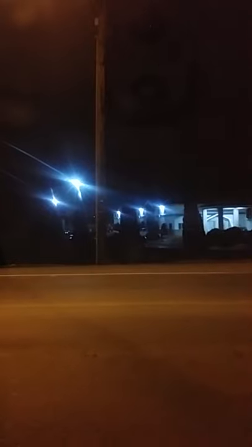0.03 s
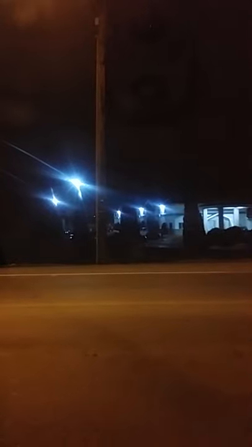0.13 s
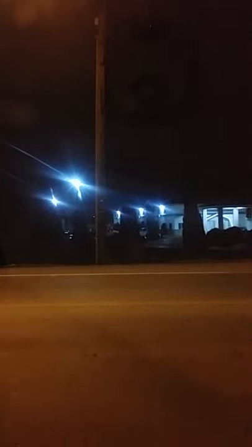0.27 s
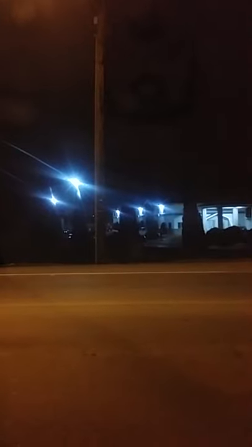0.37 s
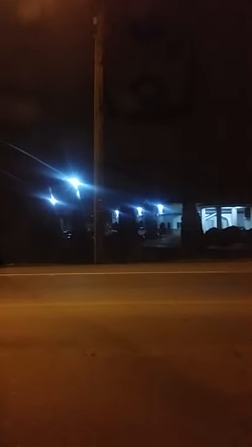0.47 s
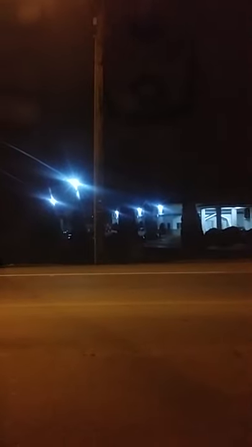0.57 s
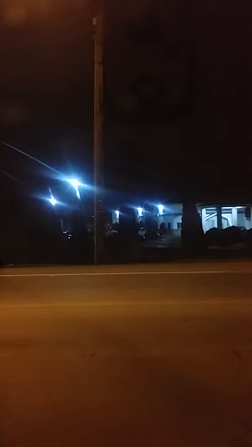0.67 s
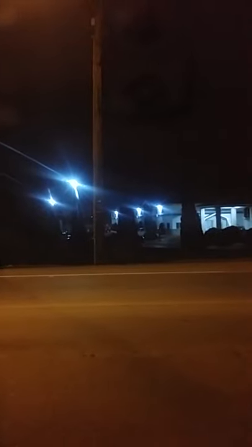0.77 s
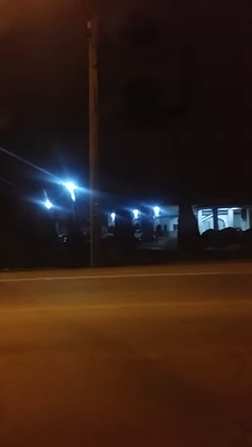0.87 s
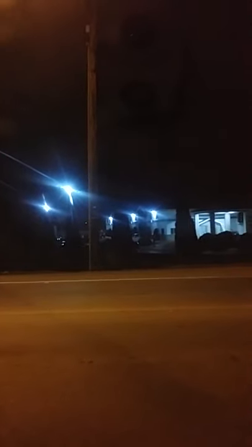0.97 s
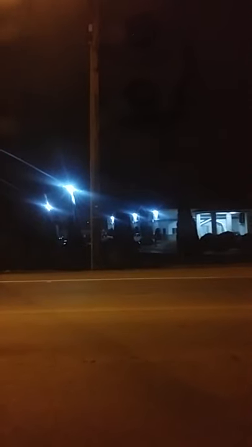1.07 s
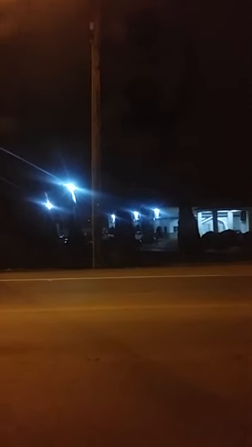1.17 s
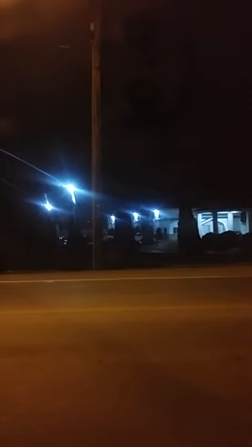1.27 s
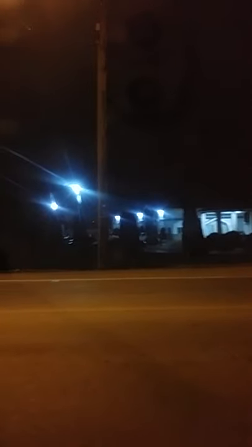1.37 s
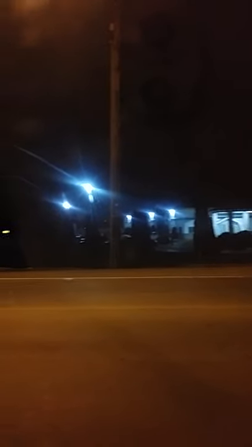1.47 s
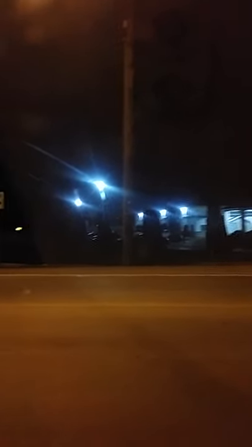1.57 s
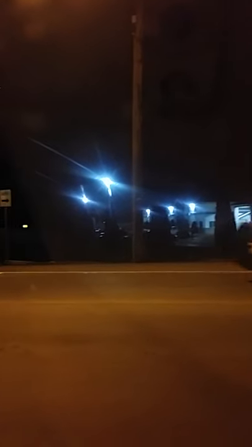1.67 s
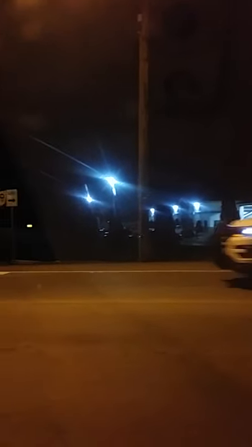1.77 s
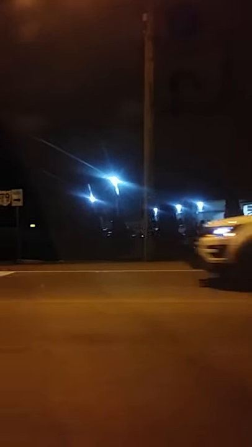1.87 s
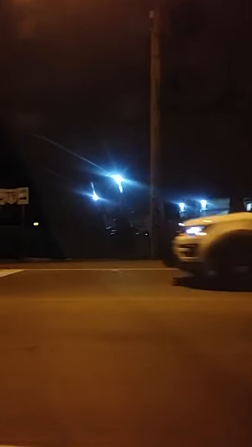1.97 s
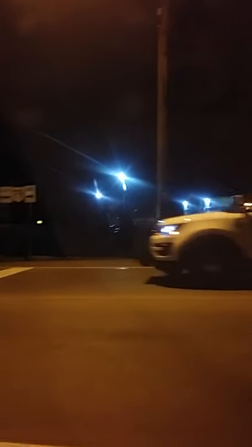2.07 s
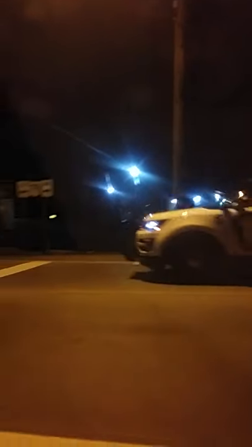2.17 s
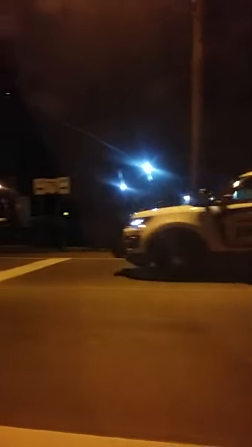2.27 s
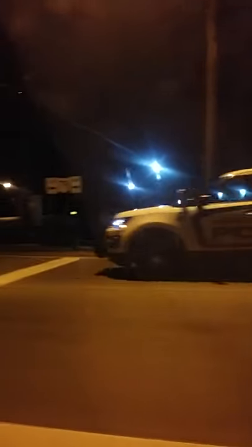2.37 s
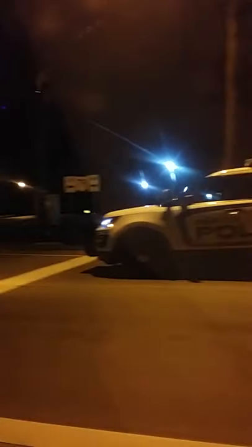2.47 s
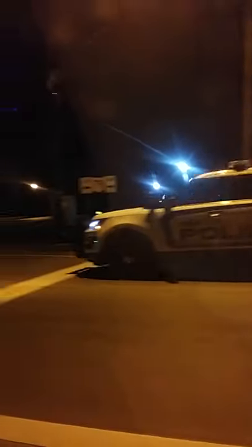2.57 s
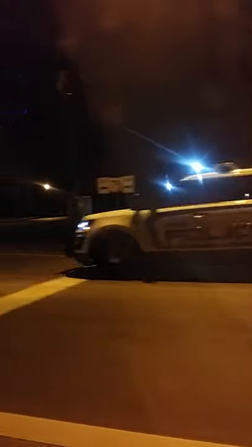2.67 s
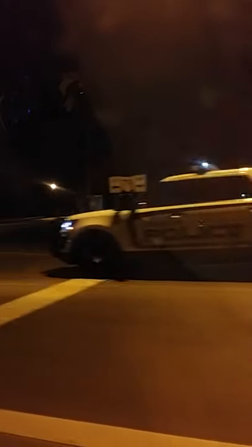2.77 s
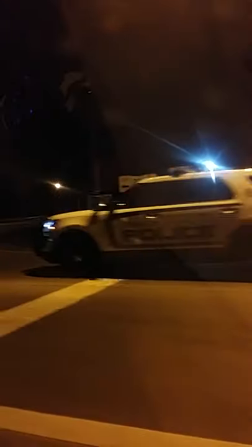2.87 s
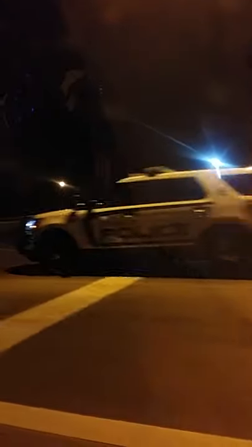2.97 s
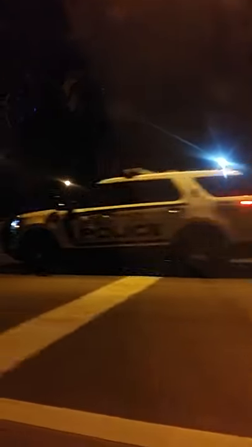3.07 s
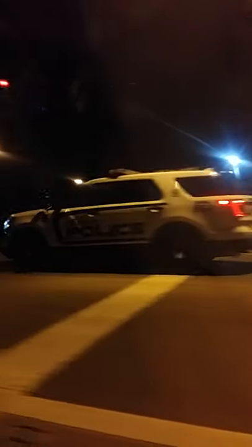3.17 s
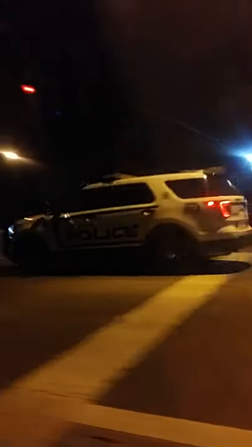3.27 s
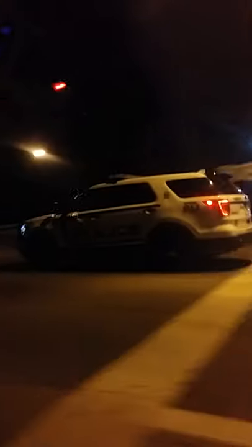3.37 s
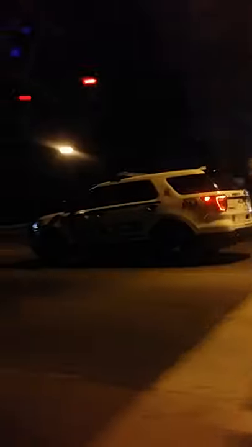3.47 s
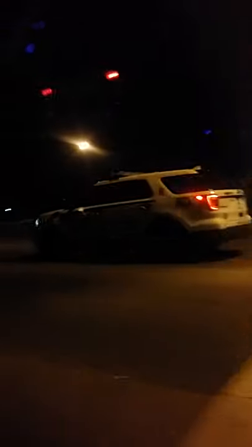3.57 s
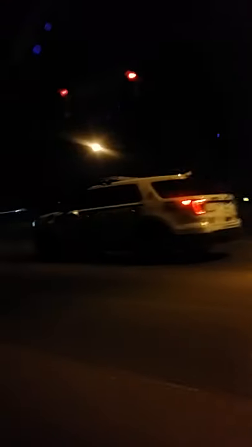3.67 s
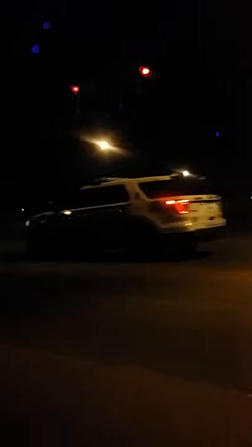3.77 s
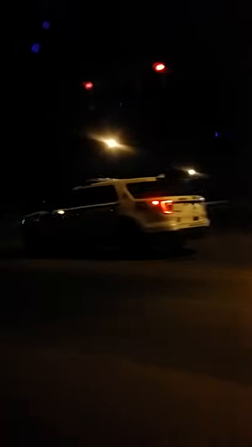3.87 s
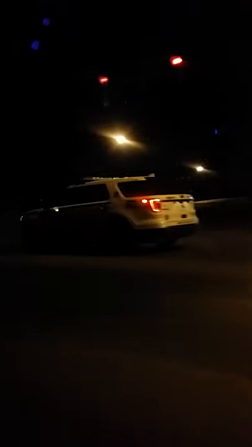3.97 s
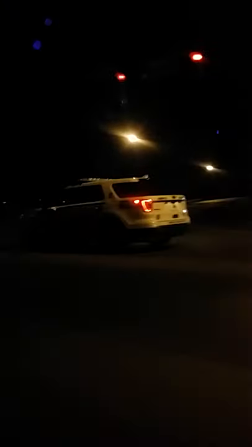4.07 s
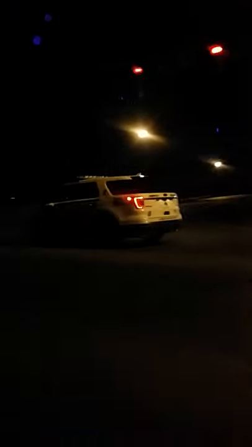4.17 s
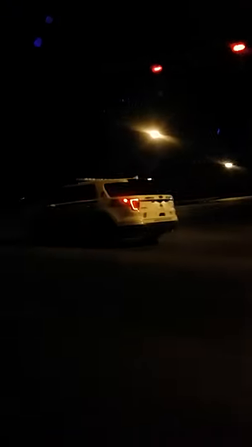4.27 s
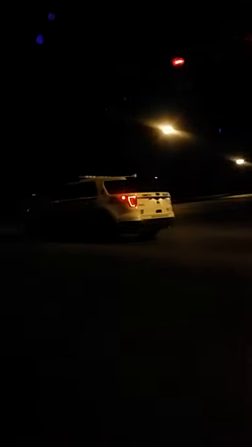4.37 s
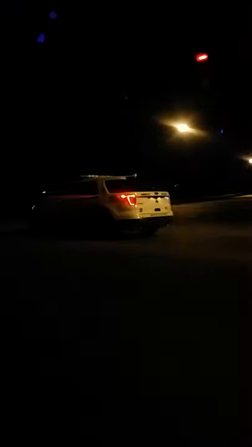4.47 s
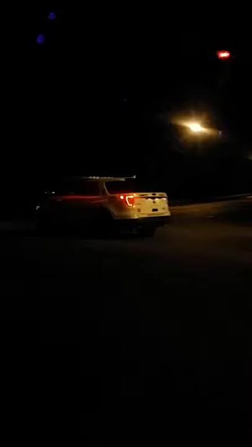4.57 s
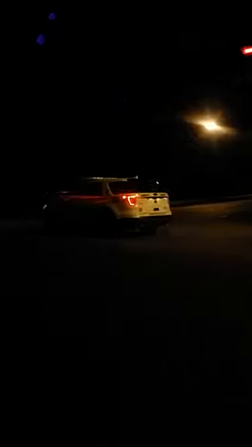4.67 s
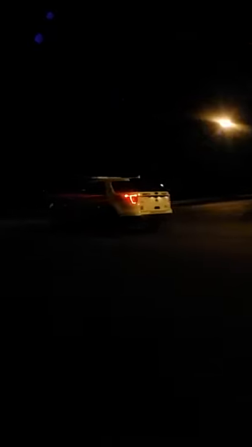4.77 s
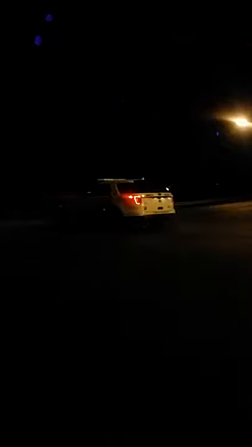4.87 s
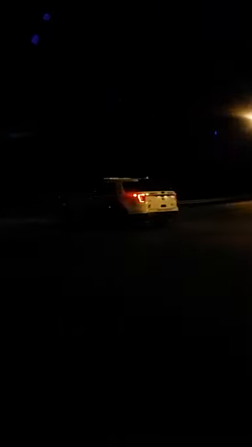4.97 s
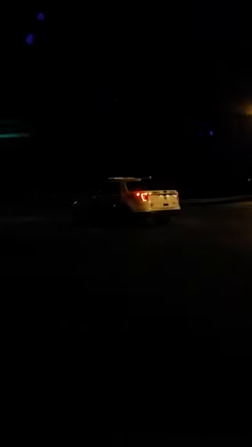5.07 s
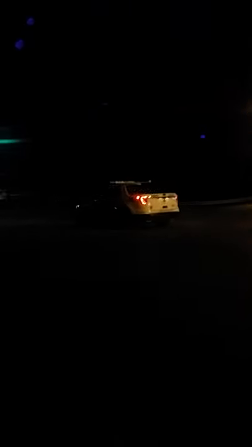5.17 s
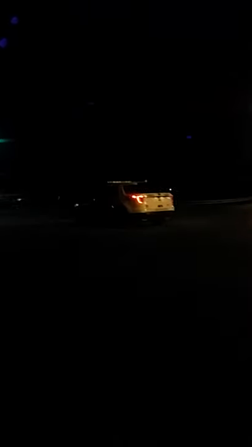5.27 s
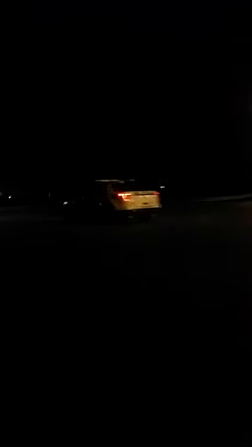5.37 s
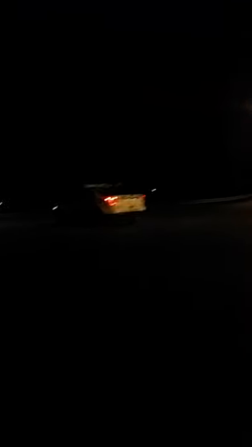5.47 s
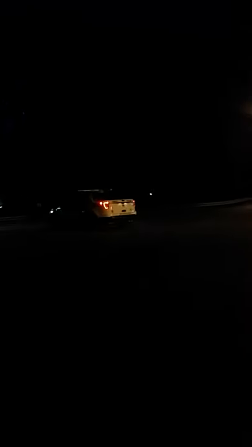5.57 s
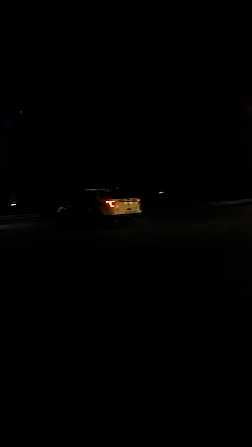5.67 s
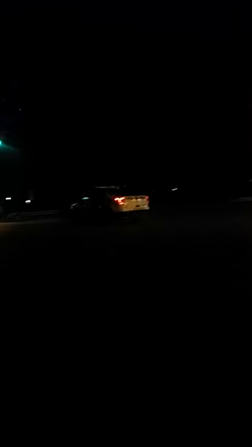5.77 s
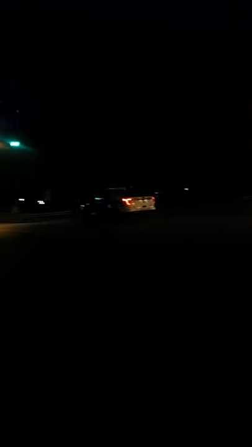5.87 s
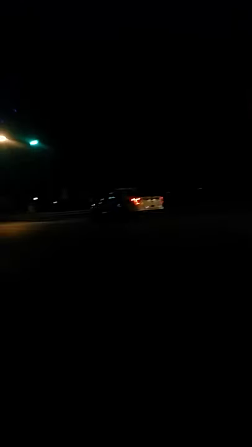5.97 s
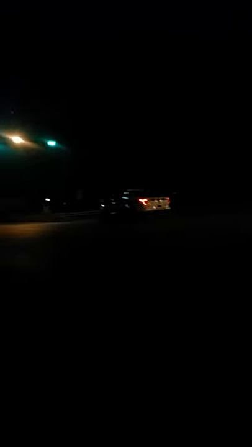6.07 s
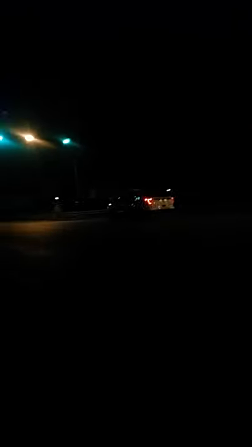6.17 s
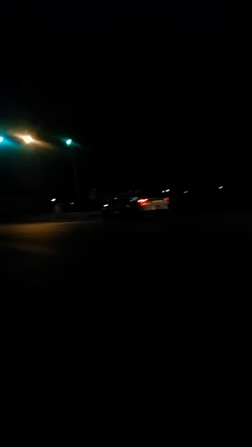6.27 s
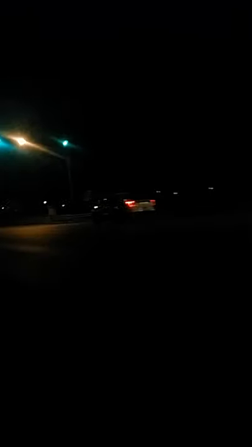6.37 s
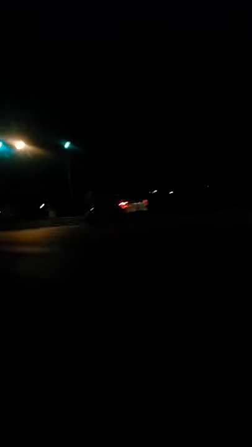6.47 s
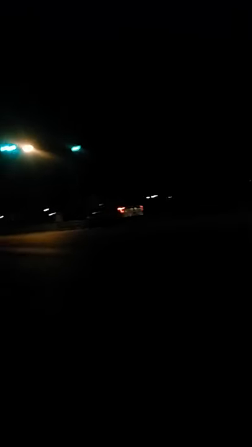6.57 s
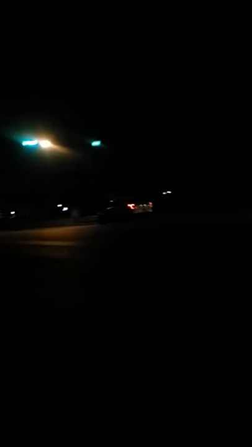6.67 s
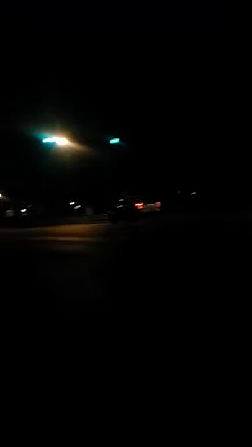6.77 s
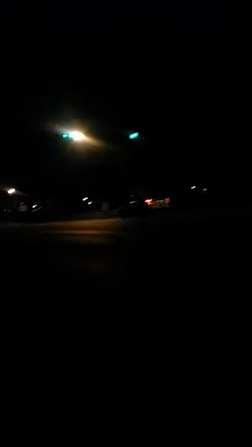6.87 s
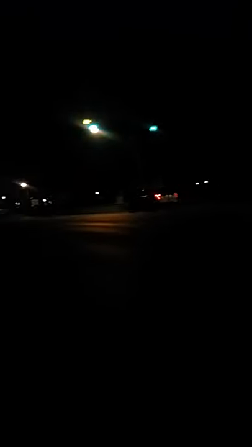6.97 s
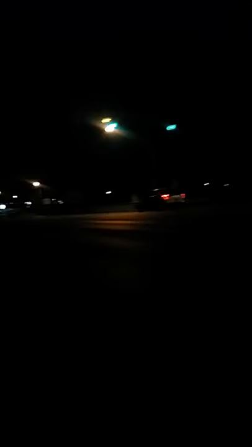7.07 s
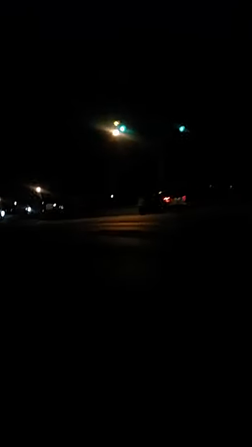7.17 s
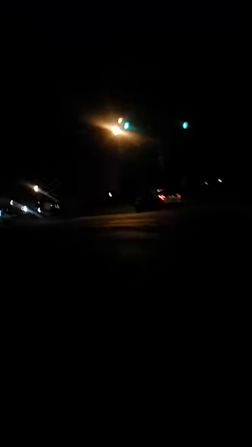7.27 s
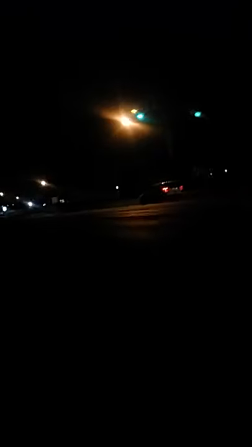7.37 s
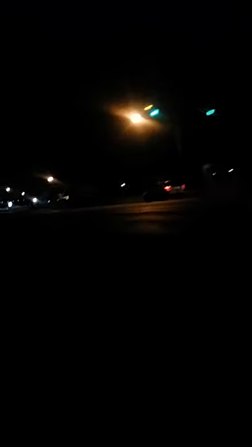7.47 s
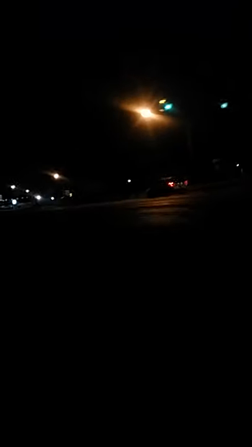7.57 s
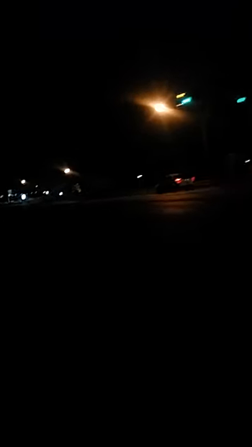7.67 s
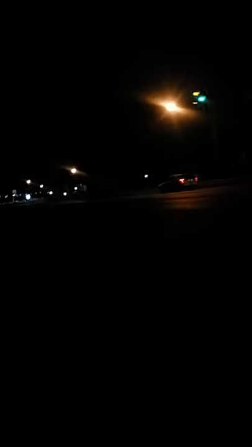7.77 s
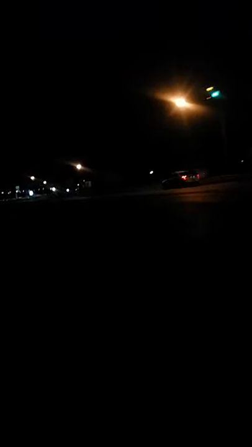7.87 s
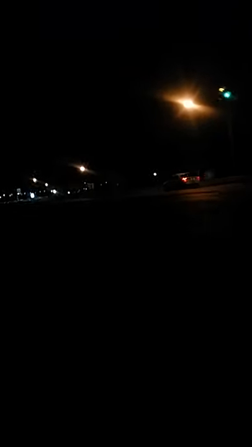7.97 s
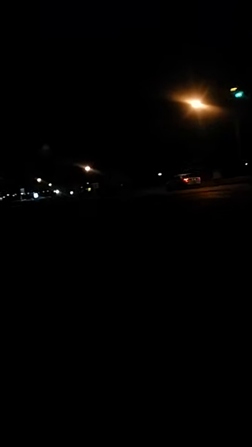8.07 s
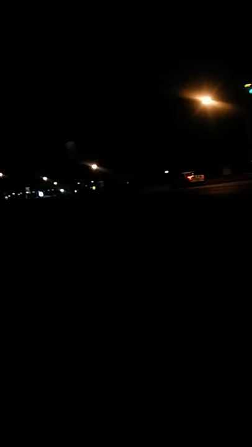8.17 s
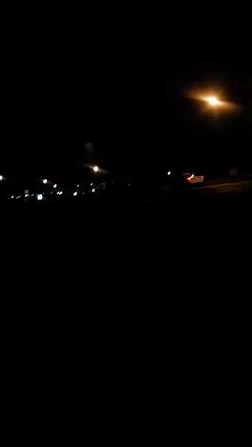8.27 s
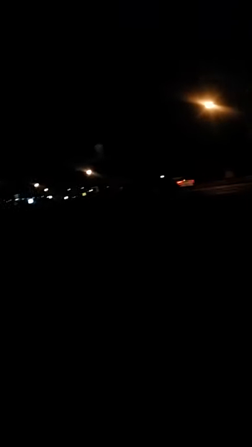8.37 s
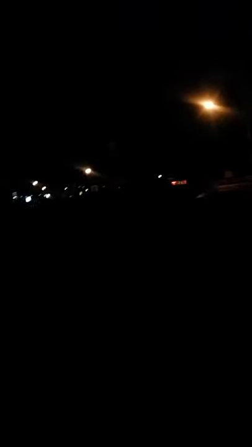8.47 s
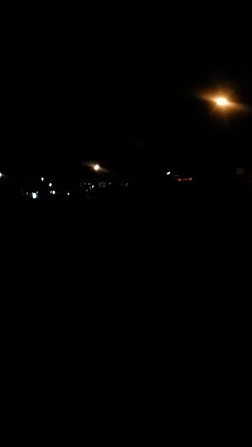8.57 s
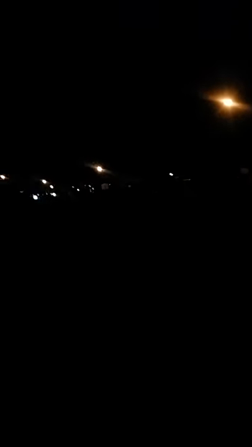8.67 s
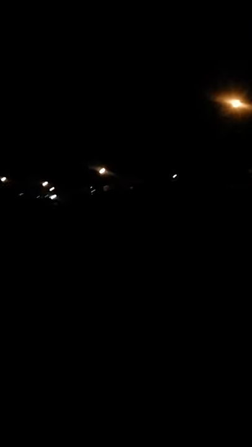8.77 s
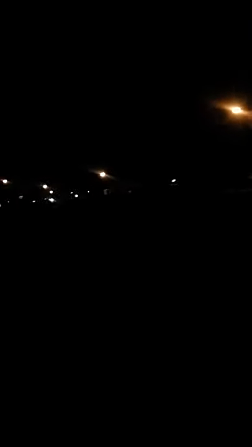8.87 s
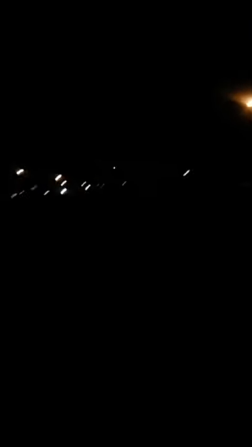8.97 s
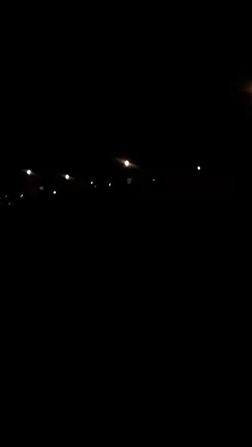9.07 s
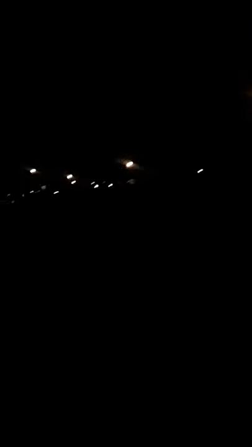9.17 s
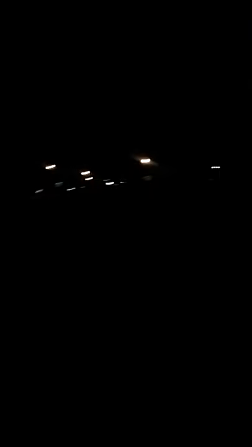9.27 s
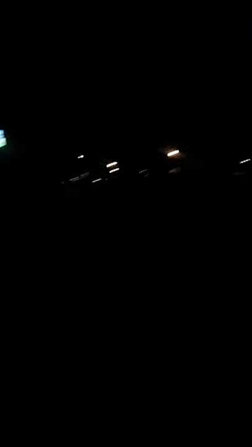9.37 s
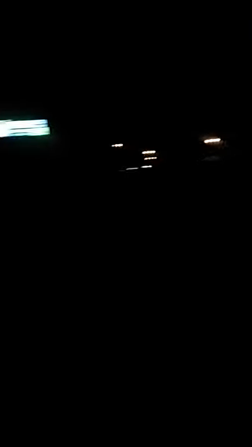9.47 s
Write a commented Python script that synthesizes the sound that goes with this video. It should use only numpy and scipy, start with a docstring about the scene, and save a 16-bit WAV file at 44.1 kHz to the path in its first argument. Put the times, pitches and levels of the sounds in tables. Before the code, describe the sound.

Close in-cabin stereo sound of a car pulling out. Quiet idle, thin hiss, a brief rustle and a dry clicking indicator come first. Then the engine note jumps up, holds, and surges into a loud growling rev with intake rush. It eases off, sinks in pitch with a rough burble at the shift, and settles into a steady, fuller pull.

```python
"""Engine pulling away, heard on board

An engine idles, pulls away, revs through first gear, shifts up and settles into a slow climb in speed.
The exhaust is a bank of cosines locked to the crank: a boom on the first orders, a growl on the half orders.
Rumble, clatter, intake rush and hiss are coloured noise that follows the drive and beats with the crank.
Valve ticks and relay snaps are short noise bursts in time; loose fittings click now and then.
A rattle, an idle fizz, a rustle, a whoosh on the hard pull and a burble in the shudders fill in the rest."""
import sys
import numpy as np
from scipy import signal
from scipy.fft import rfft, irfft, next_fast_len
from scipy.io import wavfile
from scipy.ndimage import uniform_filter1d, minimum_filter1d

SR = 44100
rng = np.random.default_rng(int(sys.argv[2]) if len(sys.argv) > 2 else 0)


def output_pcm(signal):
    """Save a mono or channel-first signal as 16-bit PCM at the path in sys.argv[1].

    Samples are clipped to [-1, 1] before scaling.
    """
    pcm = np.clip(np.atleast_2d(signal).T, -1, 1) * 32767
    wavfile.write(sys.argv[1], SR, np.round(pcm).astype(np.int16))


N = 419832
TIME = np.arange(N) / SR
BINS = np.fft.rfftfreq(N, 1 / SR)

# crankshaft speed: t/s, f/Hz (turns per second)
CRANK_SPEED = [(0, 23.4), (.66, 22.7), (.88, 23.7), (1.3, 24.2), (1.5, 31.9), (1.64, 37.5), (1.76, 41.9),
               (1.9, 47.1), (1.92, 47.3), (2.54, 47.6), (3.18, 51.5), (3.52, 64.3), (3.63, 68.4),
               (4.05, 76.2), (4.25, 79.1), (4.44, 78.7), (5.12, 86.5), (5.26, 87.4), (5.49, 80.9),
               (5.85, 77.5), (6.36, 64.7), (6.5, 61.0), (6.61, 53.5), (6.63, 52.9), (6.75, 53.3),
               (7.11, 57.2), (7.44, 59.4), (9.52, 69.8)]
# engine effort: t/s, load (0 coasting to 1 pulling), exhaust pulse level/dB
ENGINE_DRIVE = [(0.0, 0, -16), (1.28, 0.046, -16.5), (1.5, 0.13, -3.6), (1.9, 0.27, -2.5),
                (3.15, 0.24, 0.2), (3.4, 0.39, 1), (4.0, 0.44, 1.4), (4.35, 0.64, 0), (4.7, 0.71, -1.2),
                (5.5, 0.63, -0.5), (5.68, 0.11, -0.5), (6.35, 0.0, -4.5), (6.55, 0.25, 1.6),
                (6.9, 0.042, 0), (7.25, 0.32, 3.5), (7.9, 0.62, 1.5), (8.3, 0.5, 1.3), (9.52, 0.64, 0.1)]
# throttle: t/s, opening (0 to 1)
THROTTLE_OPENING = [(1.3, 0.12), (3.17, 0.16), (3.36, .95), (4.15, 0.64), (4.45, 0.3), (4.95, 0.66),
                    (5.25, .35), (5.6, 0.29), (6.9, 0.27), (7.03, 0.77), (8.8, 0.67), (9.52, 0.6)]
# driveline shudders as the drive is let off and taken up again:
# t/s, half width/s, added growl level/dB, crank wobble/turns, lost boom level/dB, burble amplitude
DRIVELINE_SHUDDERS = [(5.43, .12, 6, .022, 1.5, .06), (6.47, 0.075, 4.5, .025, 0, 0.047)]
WOBBLE, BOOM_LOSS, GROWL_GAIN, BURBLE_AMPLITUDE = 3, 4, 2, 5  # columns of the shudders

# what the silencer passes of the first crank orders: f/Hz, level/dB
SILENCER_RESPONSE = [(40, -47), (48, -32.5), (56, -19.5), (66, -10), (76, -5.5), (86, -6.5), (97, -4),
                     (110, -13), (122, -12.5), (131, -19.5), (143, -10), (154, -18), (170, -13.5),
                     (205, -18), (238, -14), (252, -16), (275, -10), (295, -21.5), (320, -34), (370, -20),
                     (395, -39.5), (418, -17), (440, -45)]
# boom, which load moves up the orders: crank order, coasting level/dB, level added at full load/dB
BOOM_LEVELS = [(1, 0.5, -12.5), (2, -5, 10), (3, -3, 8.5), (4, -3.5, 3.5), (5, -4, 4.1)]
# resonances of exhaust and body: f/Hz, level/dB
PIPE_RESONANCES = [(45, -19.5), (70, -1), (140, -7.5), (230, -2), (280, 3), (320, -7), (372, -1),
                   (394, -9.5), (418, -8.5), (445, -12), (530, -24), (615, -9), (670, -8), (745, -2),
                   (820, -21), (890, -6), (1000, -35), (1400, -34.5)]
# pattern of the unequal firings: crank order, level/dB
FIRING_PATTERN = [(1.5, -8), (2.5, -10.5), (3.5, -4.5), (4.5, 4), (5.5, 7), (6, 6), (6.5, 9), (7, -1.5),
                  (7.5, 7), (8, -3.5), (8.5, 8.5), (9, 5.5), (9.5, 3), (10.5, 2.5), (11.5, 0.5), (12, 3.5),
                  (12.5, -8.5), (13.5, -5.5)]

# noise colours, each f/Hz, relative level/dB (per Hz)
# gas and road shaking the body
RUMBLE_COLOUR = [(20, -29.5), (35, -20), (55, -11.5), (90, 4.5), (130, 1.5), (275, -3.5), (320, -14),
                 (480, -12.5), (570, -18), (700, -12.5), (850, -32.5), (1100, -42.5), (2000, -61.5)]
# moving parts
CLATTER_COLOUR = [(450, 5.5), (800, 6.5), (1100, 4), (1350, -1), (1620, 1), (1850, -3), (2100, -2.5),
                  (2350, -0.5), (2750, -6.5), (3100, -9.5), (3600, -13.5), (5000, -26.5), (9000, -37.5)]
# air rushing in
INTAKE_COLOUR = [(2200, -28.5), (3300, 3), (4400, 0.5), (5500, -2.5), (8000, -12), (15000, -19)]
# exhaust hiss
HISS_COLOUR = [(3500, -17), (5300, 3.5), (6400, 3.5), (7300, -1.5), (7900, -1), (8400, -2.5), (8900, -8.5),
               (9600, -5.5), (11000, -11), (14500, -11.5), (15500, -17)]
# loose panel buzzing
RATTLE_COLOUR = [(4500, -30.5), (6000, -7.5), (7300, -6), (8400, -3.5), (9300, -14.5), (15000, -26.5)]
# thin hiss at idle
FIZZ_COLOUR = [(2500, -14.5), (5000, 1), (9000, -0.5), (15000, 1)]
# relay closing
TICK_COLOUR = [(600, -9.5), (2200, 7), (4200, -2), (6400, 1), (8500, 0.5), (11000, -6), (15500, 2.5)]
# relay opening
TOCK_COLOUR = [(600, -4), (2200, -1), (4200, -6), (6400, 0), (9300, 3), (11000, -12.5), (15500, -13.5)]
# loose fittings
CLICK_COLOUR = [(500, -2), (1300, 10), (2200, 11), (4200, 0), (6400, 3.5), (8500, -1.5), (11000, -6),
                (15500, -16.5)]
# rush of the hard pull
WHOOSH_COLOUR = [(600, -6.5), (920, 17.5), (1300, -1.5), (2300, 9), (3300, -5.5), (5000, -9.5), (6400, 3.5),
                 (7800, -7), (11000, -22.5)]
# rough exhaust during a shudder
BURBLE_COLOUR = [(120, -20), (230, -3), (300, 2), (410, 0), (500, -11), (720, -9), (950, -28.5),
                 (2000, -58.5)]

# loose fittings: t/s, level/dB before trim, low part against the whole/dB before trim, ring time/s
FITTING_CLICKS = [(0.2804, -39, 4, 0.069), (0.305, -37, 3, 0.046), (0.825, -38, -2, 0.039),
                  (1.343, -31.5, -4.5, 0.07), (1.717, -27.5, -1, 0.08), (1.952, -32.5, 1, 0.047),
                  (3.014, -37, -17, 0.054), (3.046, -34, -2, 0.053), (3.531, -20, -0.5, 0.08),
                  (8.775, -32.5, 7, 0.06), (8.7895, -27.5, 7, 0.1), (8.8144, -33, 3, 0.079)]
# colour of the two ports: f/Hz, left minus right level/dB
PORT_BALANCE = [(40, -1.2), (200, 0), (450, 1), (750, -3), (950, 4), (1400, 0), (1800, 0), (2350, -6),
                (2900, 0), (4500, 3), (5600, 2), (6400, 9), (7500, 0), (8400, -10), (11500, 0)]
# how alike the two ports are: f/Hz, likeness (0 unrelated to 1 identical)
PORT_LIKENESS = [(100, 0.66), (300, 0.97), (550, 0.83), (800, 0.54), (1300, 0.15), (15000, 0)]

IDLE_HZ = 24  # crank speed from which octaves are counted
BUZZ_HZ, BUZZ_WIDTH_HZ = 78.65, 3.67  # the body buzzes as the crank speed passes its resonance
RELAY_START_S, RELAY_STEP_S, RELAY_STOP_S = 0.2665, 0.3502, 9.1
EDGE_HZ = 15750  # top of the band


def from_db(db):
    """Decibels to amplitude."""
    return 10 ** (np.asarray(db) / 20)


def unit(x):
    """Scale to rms 1."""
    return x / np.sqrt(np.mean(x ** 2) + 1e-20)


def curve(table, column):
    """One column of a table, joined by straight lines in time."""
    rows = np.array(table)
    return np.interp(TIME, rows[:, 0], rows[:, column])


def at_hz(points, hz):
    """A spectrum table read on a log-frequency axis."""
    f, value = np.transpose(points)
    return np.interp(np.log(hz + 1), np.log(f), value)


def octaves_above_idle(speed):
    """Crank speed as octaves above idle."""
    return np.log2(speed / IDLE_HZ)


def wander(rate_hz):
    """Slow chance of rms 1, up to about the given rate."""
    lowpass = 1 / (1 + (BINS / rate_hz) ** 4)
    return unit(irfft(rfft(rng.standard_normal(N)) * lowpass, N))


def drift(rate_hz, size=512):
    """Slow chance: random values joined by straight lines, rate_hz of them a second."""
    return np.interp(TIME * rate_hz, np.arange(size), rng.standard_normal(size))


def noise(colour):
    """Coloured stereo noise: alike at both ports in the bass, unrelated in the treble."""
    mid, side = rfft(rng.standard_normal((2, N)))
    same = np.clip(at_hz(PORT_LIKENESS, BINS), -1, 1)
    mid, side = mid * np.sqrt(1 + same), side * np.sqrt(1 - same)
    pair = irfft(np.array([mid + side, mid - side]) * from_db(at_hz(colour, BINS)), N)
    return pair / np.std(pair.mean(0))


def puffs(turns, depth):
    """Gas leaves in one puff for each turn of the crank, so the level swells once a turn."""
    return unit(1 + depth * np.cos(2 * np.pi * turns))


def shudder(column):
    """One column of the shudders, each swelling and dying smoothly."""
    return sum(row[column] * np.exp(-((TIME - row[0]) / row[1]) ** 2) for row in DRIVELINE_SHUDDERS)


def boom(turns, speed, boom_db=0.98, dispersion=0.632, sway_db=0.59):
    """The first crank orders: near-pure tones that swell and fade through the silencer's resonances."""
    load, out = curve(ENGINE_DRIVE, 1), np.zeros(N)
    for order, (_, coast_db, load_db) in enumerate(BOOM_LEVELS, 1):
        uneven = 1 + .06 * wander(20)
        lag = dispersion * order ** 2  # higher orders are delayed more, which smears each pulse
        passed_db = at_hz(SILENCER_RESPONSE, order * speed)
        level = from_db(passed_db + coast_db + load_db * load + sway_db * order * drift(5))
        out += level * uneven * np.cos(2 * np.pi * order * turns - lag)
    return out * from_db(boom_db + curve(ENGINE_DRIVE, 2) - shudder(BOOM_LOSS))


def pipe_levels(speed):
    """Lower pipe modes growl with load and in the shudders; upper ones rasp with load and speed."""
    load, octaves = curve(ENGINE_DRIVE, 1), octaves_above_idle(speed)
    growl_db = -33 + 11 * load - 0.85 * octaves + shudder(GROWL_GAIN)
    rasp_db = -54.5 + 10.0 * load + 7.5 * octaves
    return from_db(growl_db), from_db(rasp_db)


def growl(turns, speed, split_hz=520, sway_db=2.5, smear_turns=0.006, count=56):
    """Firings repeat every two turns: half orders and overtones sound, phases scattered by pipe echoes."""
    low, high = pipe_levels(speed)
    grid = np.arange(3000.)  # 1 Hz steps
    pipe = from_db(at_hz(PIPE_RESONANCES, grid)) / (1 + (grid / 1600) ** 6)
    upper = 1 - 1 / (1 + (grid / split_hz) ** 12)
    # higher tones reach the two ports out of step
    spread = np.arccos(np.clip(at_hz(PORT_LIKENESS, grid), -1, 1)) / 2
    steadiness = 1 - 0.36 * curve(ENGINE_DRIVE, 1)  # load calms the phase scatter
    out = np.zeros((2, N))
    for order in np.arange(3, count) / 2:
        if order % 1 == 0 and order <= len(BOOM_LEVELS):
            continue  # the boom already sounds these
        hz = np.minimum(order * speed, len(grid) - 1).astype(int)
        firing_db = np.interp(order, *np.transpose(FIRING_PATTERN))
        body = pipe[hz] * (low + (high - low) * upper[hz])
        level = from_db(firing_db + sway_db * drift(2.5)) * body
        scattered = turns + smear_turns * steadiness * drift(30)
        phase = 2 * np.pi * (order * scattered + rng.random())
        side = rng.choice([-1, 1]) * spread[hz]
        out += level * np.cos([phase + side, phase - side])
    return out * (1 + .15 * wander(25))


def cyclic(turns, speed, colour, size=1024):
    """Random small knocks that repeat every two-turn engine cycle: a fine comb of lines, coloured."""
    cycle = np.linspace(0, 2, size, endpoint=False)
    knocks = np.array([np.interp(turns, cycle, rng.standard_normal(size), period=2) for port in range(2)])
    pair = irfft(rfft(knocks * np.sqrt(speed)) * from_db(at_hz(colour, BINS)), N)
    return pair / np.std(pair.mean(0))


def rush(turns, speed, colour, idle_db, octave_db, throttle_db, buzz_db, damping=0.42):
    """Part repeating, part turbulent noise that follows speed, throttle and body buzz, which load damps."""
    repeat = .45  # share of the power that repeats each cycle
    grain = np.sqrt(repeat) * cyclic(turns, speed, colour) + np.sqrt(1 - repeat) * noise(colour)
    resonance = 1 / (1 + ((speed - BUZZ_HZ) / BUZZ_WIDTH_HZ) ** 4)
    buzz = (1 - damping * curve(ENGINE_DRIVE, 1)) * resonance
    level_db = idle_db + octave_db * octaves_above_idle(speed)
    return grain * from_db(level_db + throttle_db * curve(THROTTLE_OPENING, 1) + buzz_db * buzz)


def machinery(turns, speed, flutter_db=1.2):
    """Clatter of moving parts, intake rush, exhaust hiss and whoosh, all beating with the crank."""
    clatter = rush(turns, speed, CLATTER_COLOUR, idle_db=-49.5, octave_db=2.0, throttle_db=10.5, buzz_db=4.0)
    intake = rush(turns, speed, INTAKE_COLOUR, idle_db=-70.5, octave_db=0.0, throttle_db=18.0, buzz_db=5.5)
    hiss = rush(turns, speed, HISS_COLOUR, idle_db=-64.5, octave_db=-2.34, throttle_db=-3.0, buzz_db=15)
    flutter = from_db(flutter_db * wander(22))
    return (clatter + intake + hiss + whoosh()) * puffs(turns, depth=0.11) * flutter


def valves(turns, speed, tick_db=-42, tick_hz=6550, width_hz=400, decay_s=0.00083, weak=0.49):
    """A bright narrow-band tick on every turn, strong and weak in turn; it sinks as speed rises."""
    band = 1 / (1 + ((BINS - tick_hz) / width_hz) ** 2)
    ring = unit(irfft(rfft(rng.standard_normal((2, N))) * band, N))
    since_tick_s = (turns % 1) / speed
    strike = np.exp(-since_tick_s / decay_s) * np.where(turns % 2 < 1, 1, weak)
    return ring * strike * from_db(tick_db) * (speed[0] / speed) ** 1.5


def rattle(turns, speed, rattle_db=-47, load_db=-12):
    """The first crank order buzzes a loose panel once per turn, loosest when the engine coasts."""
    first_order_db = at_hz(SILENCER_RESPONSE, speed)
    shake = from_db(first_order_db + load_db * curve(ENGINE_DRIVE, 1) + rattle_db)
    return noise(RATTLE_COLOUR) * shake * puffs(turns, depth=0.75)


def rumble(turns, rumble_db=-25.0, follow=0.66):
    """Turbulent gas and the road shake the body, harder as the exhaust pulses grow."""
    level = from_db(rumble_db + follow * curve(ENGINE_DRIVE, 2))
    return noise(RUMBLE_COLOUR) * level * puffs(turns, depth=0.083)


def fizz(speed, fizz_db=-63, octave_db=-11.5):
    """A thin hiss at idle that falls away steeply as the crank speeds up."""
    return noise(FIZZ_COLOUR) * from_db(fizz_db + octave_db * octaves_above_idle(speed))


def snaps(times, colour, peak_db, t60, rise_s=0.00035):
    """Short noise snaps of one colour: a quick rise, then a fall of 60 dB in t60 seconds."""
    t = np.arange(SR // 5) / SR
    blows = np.zeros(N)
    blows[(times * SR).astype(int)] = 1
    shape = from_db(peak_db - 60 * t / t60) * (1 - np.exp(-t / rise_s))
    return noise(colour) * signal.oaconvolve(blows, shape)[:N]


def relay(speed, octave_db=-2.4):
    """The turn signal relay closes and opens in strict time, tick, tock, a little louder at idle."""
    times = np.arange(RELAY_START_S, RELAY_STOP_S, RELAY_STEP_S)
    ticks = snaps(times[::2], TICK_COLOUR, peak_db=-38.5, t60=0.07)
    tocks = snaps(times[1::2], TOCK_COLOUR, peak_db=-40.5, t60=0.045)
    return (ticks + tocks) * from_db(octave_db * octaves_above_idle(speed))


def fittings(click_db=-7, low_db=-1, rise_s=0.0004, split_hz=3800):
    """Each loose part chatters for some milliseconds; heavier ones have more low body."""
    chatter = noise(CLICK_COLOUR)
    low = irfft(rfft(chatter) / (1 + (BINS / split_hz) ** 6), N)
    out = np.zeros((2, N))
    for start_s, db, body_db, t60 in FITTING_CLICKS:
        first = int(start_s * SR)
        span = slice(first, first + SR // 5)
        t = TIME[span] - TIME[span][0]
        blow = from_db(db + click_db - 60 * t / max(t60, .005)) * (1 - np.exp(-t / rise_s))
        extra_low = from_db(body_db + low_db) - 1
        out[:, span] += blow * (chatter[:, span] + extra_low * low[:, span])
    return out


def rustle(at_s=0.644, width_s=0.12, rustle_db=-51, grain_db=3.0):
    """A brief rustle while the engine idles, made grainy by fast chance in its level."""
    swell = np.exp(-((TIME - at_s) / width_s) ** 4)
    return noise(CLICK_COLOUR) * swell * from_db(rustle_db + grain_db * wander(80))


def whoosh(start_s=3.27, rise_s=0.3, fade_s=2.7, whoosh_db=-50):
    """A bright rush that flares with the hard pull in first gear and dies away."""
    t = np.maximum(TIME - start_s, 0)
    flare = (1 - np.exp(-t / rise_s)) * np.exp(-(t / fade_s) ** 2)
    return noise(WHOOSH_COLOUR) * from_db(whoosh_db) * flare


def burble(turns):
    """Rough exhaust noise coughs once per turn while the driveline shudders."""
    return noise(BURBLE_COLOUR) * shudder(BURBLE_AMPLITUDE) * puffs(turns, depth=0.6)


def scene():
    """Engine, body rumble and the small sounds on board, all driven by one crank."""
    speed = curve(CRANK_SPEED, 1)
    # the flywheel evens out the firings at speed; at idle they lope
    lope_turns = .002 + .008 * (speed[0] / speed) ** 2
    turns = np.cumsum(speed) / SR + lope_turns * wander(12) + shudder(WOBBLE) * wander(25)
    exhaust = boom(turns, speed) + growl(turns, speed) + burble(turns)
    mechanical = machinery(turns, speed) + valves(turns, speed) + rattle(turns, speed)
    body = rumble(turns) + fizz(speed)
    return exhaust + mechanical + body + relay(speed) + fittings() + rustle()


def record(dry, size=600):
    """Each port has its own colour; a limiter holds the peaks; then the band limit."""
    padded = next_fast_len(N + SR)
    tilt_db = at_hz(PORT_BALANCE, np.fft.rfftfreq(padded, 1 / SR)) / 2
    pair = irfft(rfft(dry, padded) * from_db([tilt_db, -tilt_db]), padded)[:, :N]
    headroom = np.minimum(1, .95 / (abs(pair).max(0) + 1e-9))
    pair = pair * uniform_filter1d(minimum_filter1d(headroom, size), size)
    lowpass = signal.firwin(511, EDGE_HZ, window=("kaiser", 9), fs=SR)
    return signal.oaconvolve(pair, lowpass[None], "same")


dry = scene()
out = record(dry)
output_pcm(out)
```